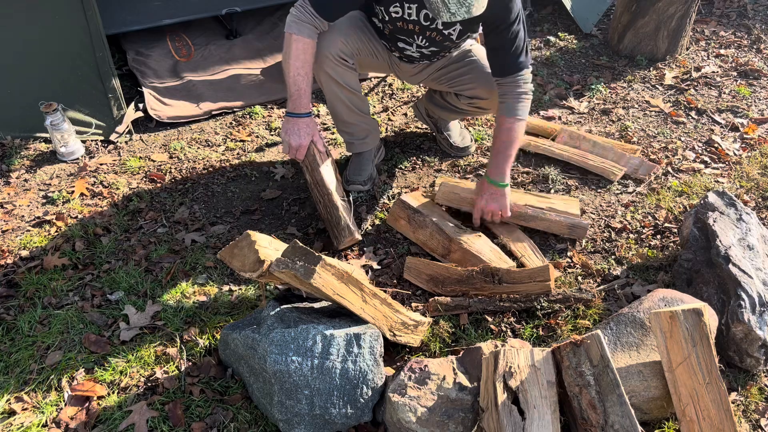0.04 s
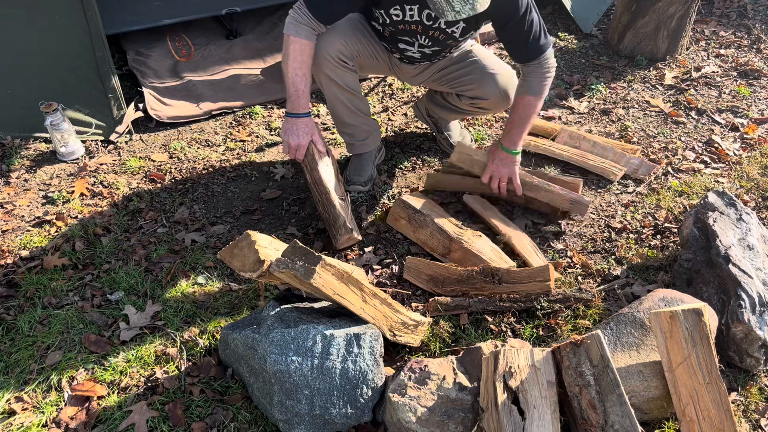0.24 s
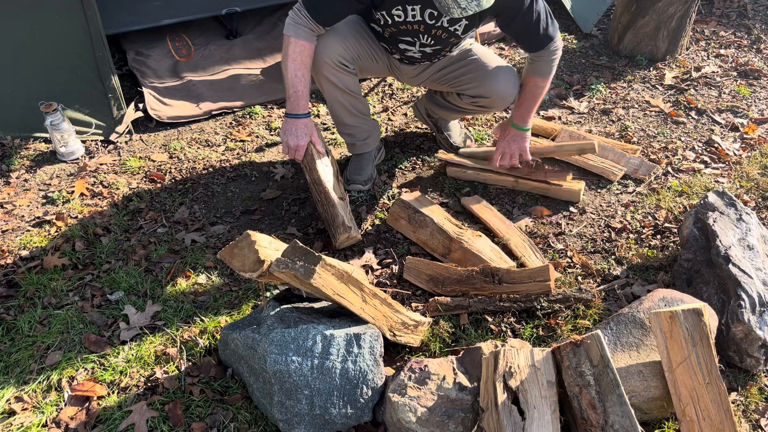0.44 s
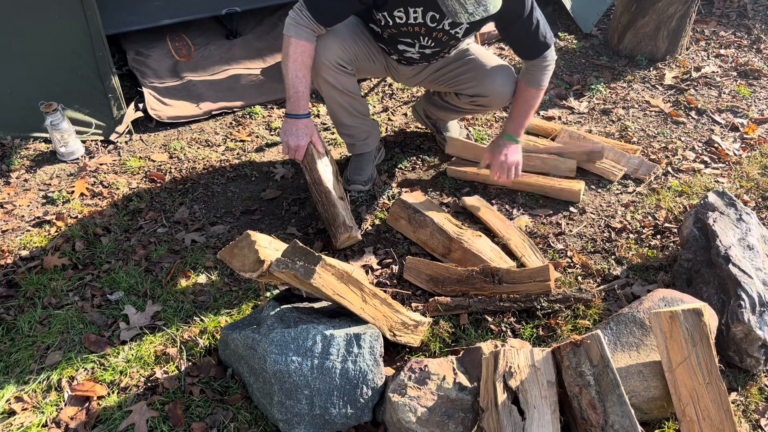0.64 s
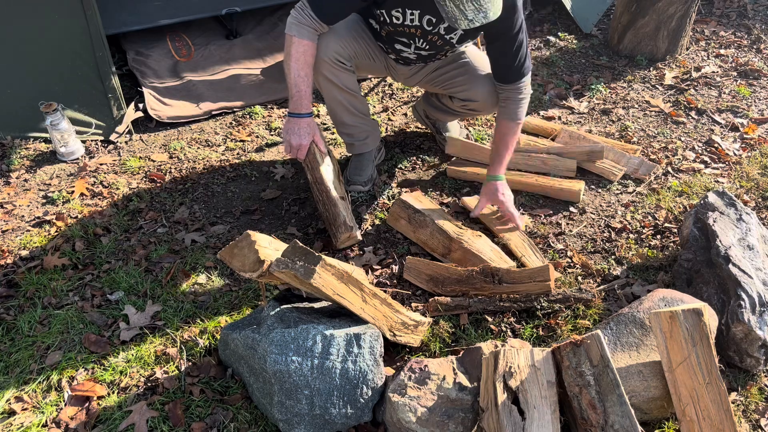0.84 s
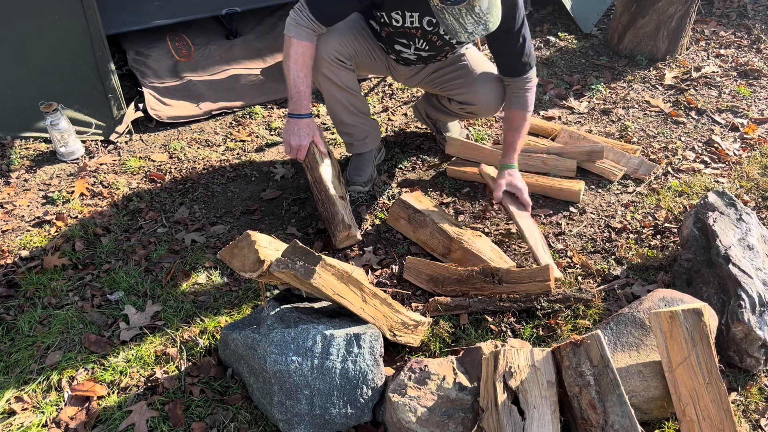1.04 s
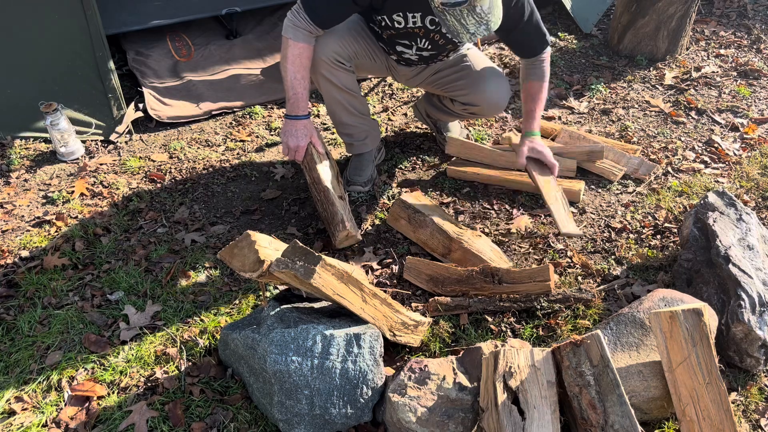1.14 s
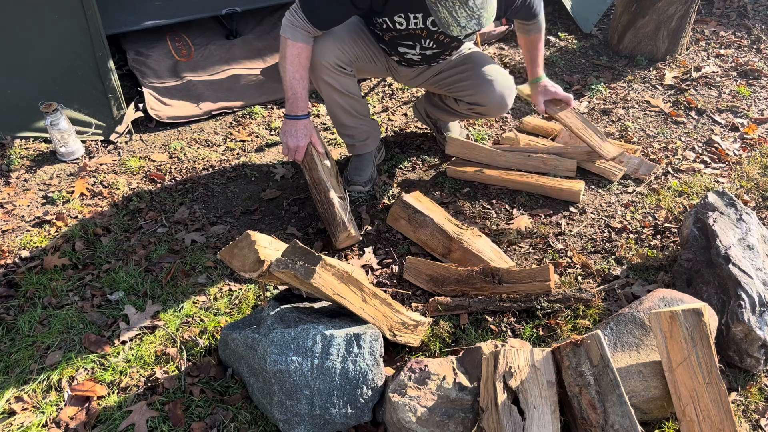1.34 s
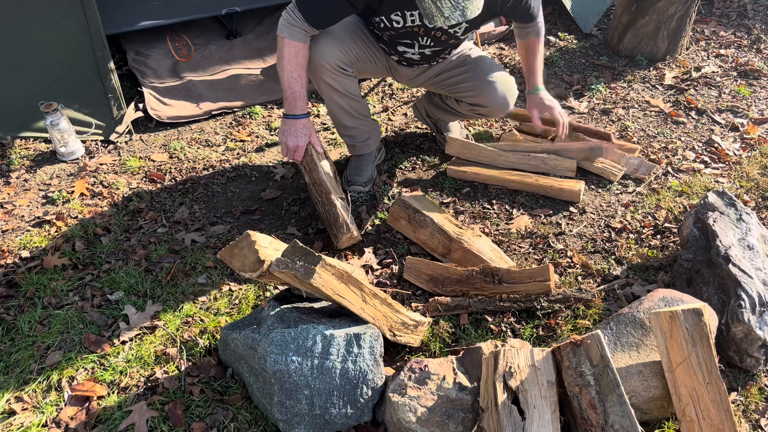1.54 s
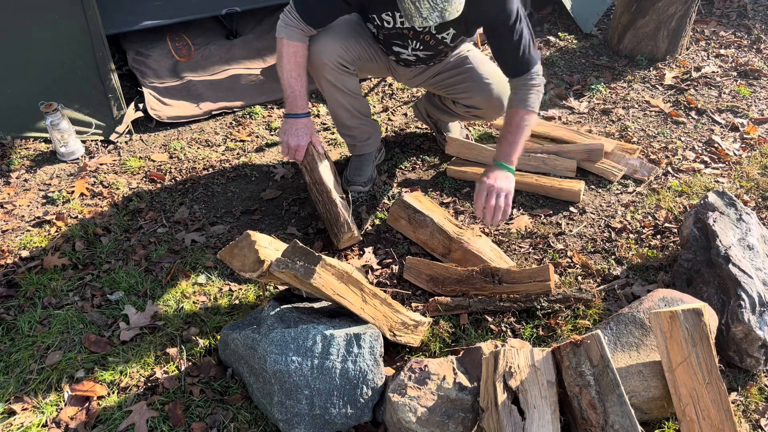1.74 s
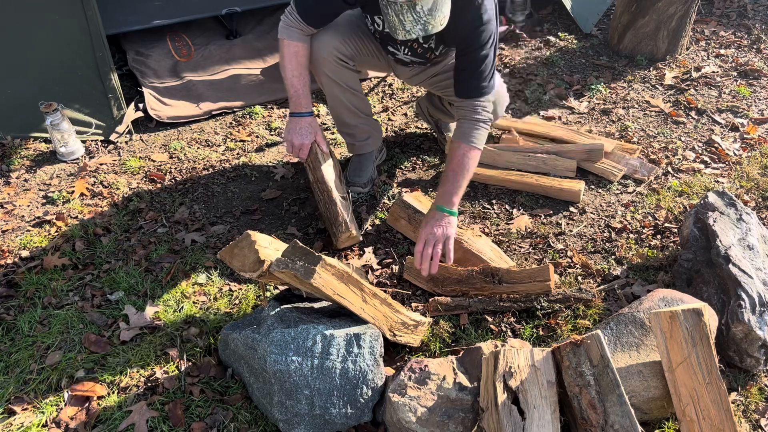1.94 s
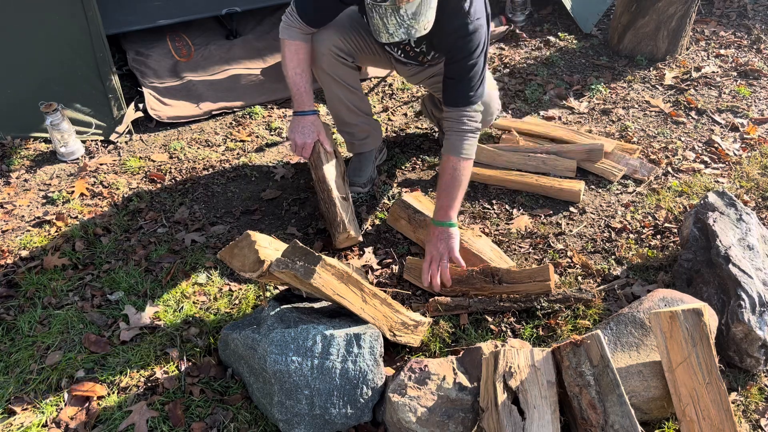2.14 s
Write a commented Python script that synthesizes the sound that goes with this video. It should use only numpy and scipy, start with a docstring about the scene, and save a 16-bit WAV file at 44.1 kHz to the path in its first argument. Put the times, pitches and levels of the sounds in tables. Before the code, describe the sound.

Firewood pieces clatter onto a stack outdoors, with rasping bark and faint sleeve swishes.

```python
"""Split firewood is sorted by hand on leafy ground outdoors, over a faint low rumble of air.
First a piece is dragged off a heap, its bark rasping, and clatters onto a stack; each knock makes
the wood ring briefly with its own tones. Then a sleeve swishes as cloth rubs on cloth.
At about 1.5 s a second piece is swung over and set down with a few more knocks.
Last come soft bumps on the soil, the tick of a leaf and more swishes of the sleeve."""
import sys
import numpy as np
from scipy import signal
from scipy.fft import rfft, irfft
from scipy.io import wavfile

SR = 44100
rng = np.random.default_rng(int(sys.argv[2]) if len(sys.argv) > 2 else 0)


def transcribe(signal):
    """Save signal, clipped to [-1, 1], as a 16-bit WAV file at the path in sys.argv[1]."""
    frames = np.atleast_2d(signal).T
    limited = np.clip(frames, -1, 1)
    pcm = np.round(limited * 32767).astype(np.int16)
    wavfile.write(sys.argv[1], SR, pcm)


N = 97020
T = np.arange(N) / SR

# The tones each piece rings with; a fade is the time to drop 60 dB: (pitch [Hz], level [dB], fade [s])
WOOD_TONES = { "hard": [(398, -31.5, 0.15), (1088, -22.5, 0.054), (1480, -40, .42), (1468, -0.5, 0.032),
              (1596.5, -11, 0.039), (2210, -24.5, .05), (2864, -20.5, 0.039)],
              "stack": [(337, -13.5, 0.036), (705, -0.5, .04), (830, -1, 0.026), (1047, -8, .11),
              (1182.4, -2.5, .045), (1770, -1.5, .036), (1890, -6.5, 0.045), (2310, -11.5, .035)],
              "long": [(442.2, -19, 0.21), (579, -24, 0.12), (710.6, -15.5, 0.095), (940, -9, 0.021),
              (1086.5, -1, 0.046), (1346, -23, 0.18), (1434, -9.5, .05)], "slim": [(410, 1.5, 0.017),
              (471, -4.5, 0.053), (1050, -1.5, 0.12), (1215, -9, .055), (1620, 2.5, 0.022),
              (1930, -16, 0.072)], "thick": [(310, -12, 0.044), (731.2, -14, 0.16), (736.4, -1, 0.062),
              (1018, -11.5, 0.032), (1283, -14.5, 0.036), (1348, -24.5, .075), (2013, -27, 0.063)],
              "light": [(765, 0, 0.051), (835, -3.5, 0.041), (1040, -7, .035), (1620, -6.5, 0.092),
              (1720, -7.5, .025)], "grounded": [(480.3, -8.5, 0.025), (694, -1.5, 0.068), (1217, -19, .2)],
              }
# Wood hits wood: (time [s], piece, ring level [dB], ring rise [s], clack level [dB],
# low edge of ring and clack [Hz], high edge of clack [Hz])
KNOCKS = [ (0.0214, "light", -31.5, 0.0031, -33, 302, 1730),
          (.0790, "thick", -38, 0.00064, -40.5, 347, 1720),
          (0.125, "long", -35.5, 0.0044, -39.5, 452, 1160),
          (0.143, "grounded", -40, .001, -34.5, 450, 1170),
          (0.195, "stack", -39, 0.00073, -36.5, 450, 1580), (0.2363, "long", -24, 0.0018, -31.5, 682, 1850),
          (.2970, "light", -30, 0.00075, -32, 606, 1850), (0.4031, "hard", -4.5, 0.0044, -21.5, 362, 2980),
          (0.4532, "light", -29.5, 0.0018, -27, 400, 2250), (0.456, "hard", -22, .002, -37, 492, 3450),
          (0.465, "hard", -25.5, .0025, -33, 686, 3350), (0.523, "hard", -41, 0.013, -34, 350, 1290),
          (0.5457, "stack", -23, 0.0021, -26.5, 341.5, 2300),
          (0.6865, "long", -19.5, 0.0026, -31.5, 380, 1400), (1.46, "slim", -24.5, .0002, -33.5, 230, 3860),
          (1.5527, "thick", -8, 0.00066, -31, 620, 1750), (1.5715, "thick", -43, .001, -34, 650, 1580),
          (1.6243, "light", -50, 0.0018, -48.5, 600, 1930), (1.6780, "grounded", -34, .002, -44, 300, 1010),
          ]
# Bark rasps and dry leaves crush: (time [s], level [dB], rise [s], fade [s])
CRUNCHES = [ (0.083, -41, 0.0027, 0.12), (0.114, -31.5, 0.0029, 0.074), (0.122, -37, 0.0024, 0.046),
            (0.194, -33.5, 0.013, 0.027), (0.227, -33, 0.0023, 0.057), (0.242, -34.5, 0.0026, 0.089),
            (0.3, -42.5, 0.0085, 0.25), (0.408, -22.5, 0.0038, 0.01), (0.413, -22.5, 0.0023, 0.025),
            (0.436, -31, 0.002, 0.044), (0.457, -26, 0.002, 0.04), (0.473, -31.5, 0.016, 0.012),
            (0.546, -25, 0.00078, 0.048), (0.688, -38, 0.0031, 0.062), (1.46, -34, 0.00085, 0.071),
            (1.557, -44, 0.0044, 0.05), (1.575, -42, 0.0035, 0.047), (1.679, -50.5, 0.0038, 0.067), ]
# Tone colour of rasping bark: (frequency [Hz], relative level [dB])
BARK_COLOUR = [(500, -3.5), (2000, -9.5), (3600, -9.5), (5300, -16.5), (8000, -8), (11500, -8.5),
               (14500, 0.5), (16000, -7)]
# Splinters snap off the bark: (time [s], level [dB])
SPLINTERS = [(0.0465, -33), (0.115, -30), (.1213, -31.5), (0.2296, -19.5), (0.2721, -30)]
# Loudness of wood sliding over wood and leaves: (time [s], level [dB])
DRAG_LOUDNESS = [(0, -46), (.24, -44), (.32, -56.5), (.38, -59.5), (.45, -49), (.5, -45.5), (.65, -60.5),
                 (.75, -79.5), (1.54, -82.5), (1.59, -48.5), (1.65, -62.5), (1.73, -58), (1.8, -87)]
# Tone colour of the heap under the sliding piece: (frequency [Hz], relative level [dB])
HEAP_COLOUR = [(150, -20), (330, -10.5), (620, 6), (1100, 1.5), (1700, -3), (2400, -15.5), (5000, -29.5)]
# Dull bumps on the soil: (time [s], level [dB], pitch [Hz])
SOIL_BUMPS = [(0.55, -37, 154), (1.552, -39, 125.7), (1.724, -42, 340), (2.033, -48.5, 320)]
# Single leaves tick: (time [s], level [dB], pitch [Hz])
LEAF_TICKS = [(1.4, -54, 8700), (1.918, -57.5, 5600)]
# Loudness of the sleeve's swish: (time [s], level [dB])
SLEEVE_LOUDNESS = [(.6, -63), (.8, -74.5), (.9, -61), (1.08, -54), (1.18, -63.5), (1.23, -57.5),
                   (1.36, -61), (1.41, -76), (1.49, -56.5), (1.54, -73.5), (1.81, -74), (1.96, -57),
                   (2.06, -70), (2.16, -56), (2.2, -73.5)]
# Tone colour of rubbing cloth: (frequency [Hz], relative level [dB])
CLOTH_COLOUR = [(800, -9), (2100, -11), (3500, -7.5), (5500, -13), (8000, -14.5), (11000, -5.5),
                (14000, 2.5), (16000, -2)]
# Tone colour of the outdoor air: (frequency [Hz], relative level [dB])
AIR_COLOUR = [(30, 3.5), (52, -1), (78, 2.5), (200, -12.5), (400, -18.5), (1200, -22), (3000, -36.5),
              (15000, -33)]

CLACK_RISE_S, CLACK_FADE_S, THUD_DB = .0007, .036, -18   # the thud is relative to the clack
CRACKS_PER_S, SLIPS_PER_S, SNAGS_PER_S = 4000, 2200, 1500   # bark, wood, cloth; in each pitch band
HEAP_DB, RING_DB, BARK_DB, GROUND_DB = -6, -11.5, -4.5, -14.5   # relative to DRAG_LOUDNESS
AIR_DB, AIR_WAVER_DB = -61.5, 2.5
SCATTER_DB, ECHO_DB, ECHO_DELAY_S = -32.5, -32, .12


def knocks():
    """Each blow rings one piece and draws a short clack and a faint thud from the heap beneath."""
    out = np.zeros(N)
    for time, piece, ring_db, rise_s, clack_db, low_hz, high_hz in KNOCKS:
        ring = from_db(ring_db) * ringing(piece, time, rise_s)
        dull_noise = butter(noise(), high_hz, "low", order=10)
        clack = rms_one(butter(dull_noise, low_hz, "high", order=3))
        thud = from_db(THUD_DB) * noise_band(70, 400)
        out += butter(ring, low_hz, "high")
        out += from_db(clack_db) * struck(time, CLACK_RISE_S, CLACK_FADE_S) * (clack + thud)
    return out


def ringing(piece, time, rise_s):
    """A struck piece shakes with several tones at once, each fading at its own speed."""
    out = np.zeros(N)
    for k, (hz, db, fade_s) in enumerate(WOOD_TONES[piece]):
        tone = (-1) ** k * np.cos(2 * np.pi * hz * (T - time))   # every other tone starts upside down
        out += from_db(db) * struck(time, rise_s, fade_s) * tone
    return out


def crunches():
    """Tiny cracks in bark and leaves swell as the weight comes on and die away as it settles."""
    power = np.zeros(N)
    for time, db, rise_s, fade_s in CRUNCHES:
        rising = (T - time) / rise_s
        falling = -np.log(1000) * (T - time) / fade_s
        power += (from_db(db) * np.exp(np.minimum(rising, falling))) ** 2
    return np.sqrt(power) * colour(grains(CRACKS_PER_S), BARK_COLOUR)


def splinters():
    """Splinters break off with sharp, very bright snaps that die at once."""
    snaps = sum(from_db(db) * struck(time, rise_s=0, fade_s=.012) for time, db in SPLINTERS)
    return snaps * noise_band(10200, 15800)


def drag():
    """Uneven slips murmur in the heap, ring the sliding piece, rasp its bark and rumble in the ground."""
    slips = grains(SLIPS_PER_S)
    heap = from_db(HEAP_DB) * colour(slips, HEAP_COLOUR)
    one_ring = ringing("long", time=0, rise_s=0)
    ring = from_db(RING_DB) * rms_one(signal.fftconvolve(slips, one_ring)[:N])
    bark = from_db(BARK_DB) * colour(grains(CRACKS_PER_S), BARK_COLOUR)
    ground = from_db(GROUND_DB) * noise_band(25, 130)
    flutter_db = 5.5 * drift(rate_hz=50)
    rubbing = from_db(flutter_db) * heap + from_db(.5 * flutter_db) * bark
    return level(DRAG_LOUDNESS) * (rubbing + ring + ground)


def soil_bumps():
    """Each soft bump on the soil is one low tone that dies quickly."""
    return sum(from_db(db) * struck(time, rise_s=.00054, fade_s=.0292) * np.sin(2 * np.pi * hz * (T - time))
               for time, db, hz in SOIL_BUMPS)


def leaf_ticks(width_s=.0021):
    """A lone leaf ticks with a tiny burst of high hiss."""
    return sum(from_db(db) * np.exp(-abs(T - time) / width_s) * noise_band(hz / 1.25, hz * 1.19)
               for time, db, hz in LEAF_TICKS)


def sleeve():
    """Fibres snag as cloth rubs on cloth while the arm swings."""
    flutter_db = 1.5 * drift(rate_hz=40)
    return level(SLEEVE_LOUDNESS) * from_db(flutter_db) * colour(grains(SNAGS_PER_S), CLOTH_COLOUR)


def yard_echoes(sound):
    """Sound scatters faintly off nearby stones, then comes back blurred from the trees."""
    stones = butter(noise(), [290, 3100], "band") * struck(0, rise_s=.01, fade_s=.3)
    trees = butter(noise(), [1200, 4000], "band") * struck(ECHO_DELAY_S, rise_s=.01, fade_s=.3)
    scatter = from_db(SCATTER_DB) * stones / np.linalg.norm(stones)
    echo = from_db(ECHO_DB) * trees / np.abs(rfft(trees)).max()
    return signal.fftconvolve(sound, scatter + echo)[:N]


def air():
    """Quiet outdoor air, mostly a low rumble that wavers a little."""
    return from_db(AIR_DB - AIR_WAVER_DB * drift(rate_hz=8)) * colour(noise(), AIR_COLOUR)


def struck(time, rise_s, fade_s):
    """Loudness of a blow: it builds while the contact lasts, then dies away."""
    age = np.maximum(T - time, 0)
    rise = np.minimum(age / max(rise_s, 1e-5), 1)
    return rise * np.exp(-np.log(1000) * np.maximum(age - rise_s, 0) / fade_s)


def grains(per_s, spread_db=3):
    """Tiny random clicks of uneven size in twelve pitch bands, about per_s a second in each."""
    edges_hz = np.geomspace(150, 19000, 13)
    out = np.zeros(N)
    for band in zip(edges_hz, edges_hz[1:]):
        sizes = from_db(spread_db * np.minimum(rng.exponential(1, N), 4))
        signs = rng.choice([-1, 1], N)
        happens = rng.random(N) < per_s / SR
        out += butter(sizes * signs * happens, band, "band")
    return out


def colour(x, table):
    """Give a sound a table's tone colour, fading below its first row, at average strength 1."""
    hz, db = np.transpose(table)
    freqs = np.maximum(np.arange(N // 2 + 1) * SR / N, 1)
    gain = from_db(np.interp(np.log(freqs), np.log(hz), db)) * np.minimum(freqs / hz[0], 1)
    return rms_one(irfft(rfft(x) * gain, N))


def noise():
    """Plain hiss (white noise)."""
    return rng.standard_normal(N)


def noise_band(low_hz, high_hz):
    """Noise between two frequencies, at average strength 1."""
    return rms_one(butter(noise(), [low_hz, high_hz], "band"))


def drift(rate_hz):
    """A smooth random wobble of typical size 1."""
    return rms_one(butter(rng.standard_normal(2 * N), rate_hz, "low")[N:])


def butter(x, hz, kind, order=2):
    """Keep the lows, the highs or a band; a higher order cuts more sharply."""
    return signal.sosfilt(signal.butter(order, np.clip(hz, 10, .45 * SR), kind, fs=SR, output="sos"), x)


def level(curve):
    """Join (time, level) points into a volume curve."""
    return from_db(np.interp(T, *np.transpose(curve)))


def from_db(db):
    """Turn decibels into a number to multiply by."""
    return 10 ** (np.asarray(db) / 20)


def rms_one(x):
    """Scale to an average strength (rms) of 1."""
    return x / np.sqrt(np.mean(x ** 2) + 1e-20)


def scene():
    """Wood, bark and cloth close by in the open air, in one channel."""
    wood = knocks() + crunches() + splinters() + drag() + soil_bumps() + leaf_ticks()
    return (wood + yard_echoes(wood) + sleeve() + air())[None]


def record(dry):
    """Cut away the highest treble, above 16000 Hz."""
    return signal.sosfilt(signal.ellip(10, .2, 80, 16000, fs=SR, output="sos"), dry)


dry = scene()
out = record(dry)
transcribe(out)
```